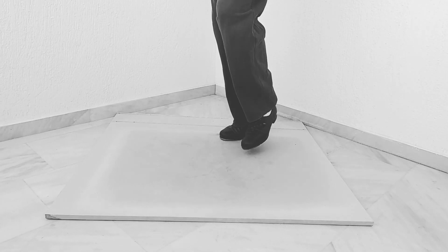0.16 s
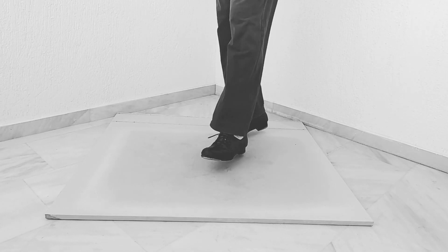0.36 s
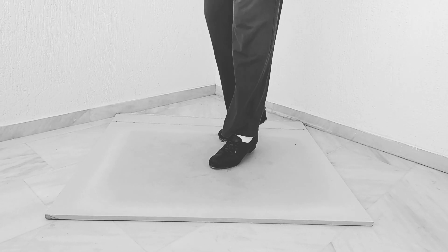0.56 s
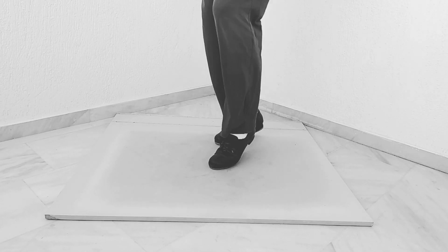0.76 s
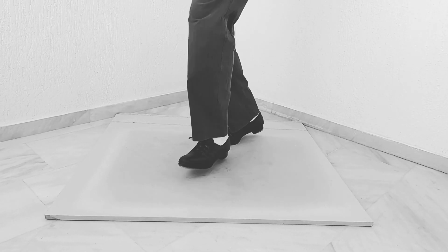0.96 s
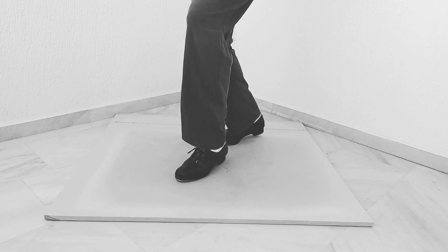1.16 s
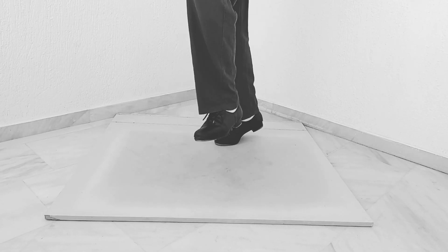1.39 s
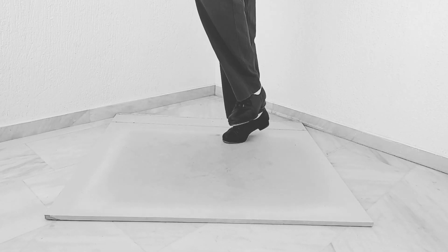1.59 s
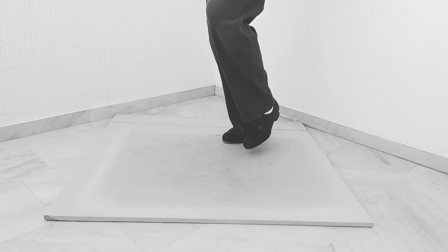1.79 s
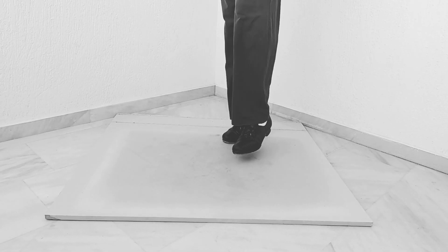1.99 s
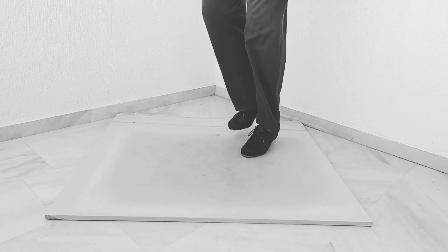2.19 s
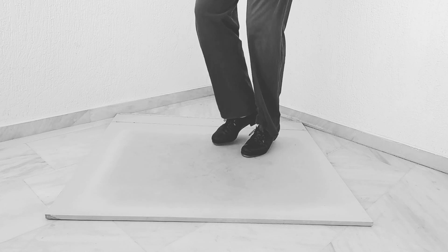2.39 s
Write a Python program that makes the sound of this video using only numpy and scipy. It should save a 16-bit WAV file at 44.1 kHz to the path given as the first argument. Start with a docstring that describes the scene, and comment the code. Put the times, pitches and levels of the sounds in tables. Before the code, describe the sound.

Tap shoes strike a hard board: three crisp hits, a loud double stomp, a faint sole shuffle with light ticks, then three more hits, close in stereo in a bare, reverberant room.

```python
"""A dancer's metal shoe plates strike a hard board in the corner of a bare, stone-floored room.
The echo of an earlier strike opens the scene; three strikes follow, then two close together as a stomp.
A sole then shifts on the board, with two light plate ticks, and three more strikes end the dance.
Each strike is a short rough contact that rings board and plate. Near walls answer strikes within 25 ms;
ticks and shuffle return half a second later. The room dies away over quiet noise, in a close stereo pair."""
import sys
import numpy as np
from scipy import signal
from scipy.fft import rfft, irfft
from scipy.io import wavfile
from scipy.ndimage import uniform_filter1d

SR = 44100
rng = np.random.default_rng(int(sys.argv[2]) if len(sys.argv) > 2 else 0)


def bounce(signal):
    """Save signal as a 16-bit WAV file at the path given by the first command-line argument."""
    frames = np.transpose(np.atleast_2d(signal))
    limited = np.clip(frames, -1, 1)
    pcm = np.round(limited * 32767).astype(np.int16)
    wavfile.write(sys.argv[1], SR, pcm)


def invert_db(x):
    """Field ratio 10**(x/20) for x, a level in decibels (scalar or array-like)."""
    u = np.asarray(x, float) / 20
    return 10 ** u


N = 108045  # length of the scene in samples
SIZE = 2 ** 15  # samples worked on for one strike or one room response

# centres of the bands that colour a strike: [Hz]
COLOUR_HZ = [60, 200, 400, 650, 1000, 1600, 2150, 2800, 3600, 4600, 5400, 6500, 7800, 9500, 12000]
# strikes of the shoe: (time [s], relative level [dB], first echo delay [s], first echo level [dB],
# change of the near walls' burst [dB], factor on ring times, then the colour at each COLOUR_HZ [dB])
STRIKES = [(.2360, 0, 0.0029, -1, 0.5, .9, -49, -40.5, -31, -27.5, -19, -18, -29, -16, -22, -24, -16.5, -18.5, -14, -37.5, -34),
           (0.4788, -5, 0.0041, 2, .5, 0.92, -42, -28.5, -30, -25.5, -19.5, -19.5, -37, -19, -17, -28, -13.5, -12.5, -17.5, -24.5, -29),
           (0.7393, -6, 0.0035, 7, 6, 1.04, -47, -24.5, -34, -16.5, -17, -16, -20, -19, -25.5, -19.5, -21.5, -19, -12.5, -36.5, -29.5),
           (1.0302, 5, 0.0042, -3, -13, 1.37, -53, -36, -34.5, -22.5, -15, -21.5, -19.5, -34, -23, -31.5, -27.5, -18.5, -24, -32, -32.5),
           (1.0448, -1, 0.0057, -5.5, -4, 1.27, -36, -15, -22, -14, -10.5, -25.5, -25.5, -14.5, -26, -30, -13.5, -12, -16.5, -21, -32),
           (1.5937, -6.5, .0036, 1.5, 5, 1.35, -50.5, -36, -16, -11.5, -19, -13, -13, -13, -16.5, -22, -24, -20, -19, -27.5, -32),
           (1.8797, -4.5, .0034, 1.5, 3.7, 1.1, -45, -33.5, -26, -21, -12, -11.5, -25, -11, -16, -17.5, -12.5, -12, -11.5, -21.5, -33),
           (2.1207, -8, .0034, 0, 3, 0.74, -48, -28, -34, -19, -17.5, -10.5, -14.5, -11.5, -19.5, -14.5, -11, -13.5, -6, -27, -32)]
# the strike before the scene opens: the columns of STRIKES after the time
EARLIER = (-11, .004, 7.5, 5, 0.85, -52, -29.5, -22.5, -16, -18.5, -12.5, -15.5, -13.5, -20, -18, -22,
           -24.5, -21, -31, -50)
EARLIER_S = -.035
# light ticks of the plate alone: (time [s], relative level [dB])
TICKS = [(1.264, -26.5), (1.485, -30)]
# echoes, ringing and colour of a tick: the columns of STRIKES after the level
TICK_COLOUR = (0.5, 0.5, -6, 0.4, -96, -94, -54, -54, -28.5, -29, -33, -43, -27, -18, -19, -18.5, -14, -25,
               -37.5)
# ringing tones of floor, board and plates:
# (frequency [Hz], level before colouring [dB], time to fall 60 dB before the strike's factor [s])
MODES = [(60, 13, 0.084), (126, 11.5, 0.055), (204.5, 6.5, 0.17), (262.2, 1.5, 0.24), (358, 6, 0.022),
         (449, 2, 0.076), (544, -3, .04), (650, -2, 0.073), (735, -1, 0.029), (888, 5, 0.029),
         (1098, 0.5, 0.0092), (1317, 6.5, 0.0058), (1584, 7.5, 0.006), (1890, 3, 0.0078), (2213, 8, 0.0033),
         (2900, -0.5, 0.0024), (3510, 4, 0.0034), (4540, 9.5, 0.0026), (5290, 9.5, 0.0017),
         (6360, 5.5, 0.0017), (6890, 9.5, 0.0048), (7080, 1.5, 0.002), (7850, 8.5, .005),
         (10000, 11, 0.009), (12900, -30.5, 0.0026)]
DETUNE = .02  # largest random shift of a tone, as a share of its frequency
CHATTER_S = .00045  # fading time constant of the contact
EVEN_HZ = 250  # width over which the contact's spectrum is evened out
STRIKE_DB = 5.5  # added to every strike and tick

# a sole shifts on the board: (start [s], length [s], level before its swell and the room [dB])
SHUFFLE = (1.1, 0.31, -51.5)
# colour of the rubbing: (frequency [Hz], relative level [dB])
SHUFFLE_COLOUR = [(100, -8.5), (220, 1.5), (500, -5), (1000, -4), (2000, -12.5), (4000, -16), (8000, -20.5),
                  (11000, -40)]
SHUFFLE_GRIT_DB = 1.5  # typical random change of level

# further single echoes: (delay [s], level before the burst change [dB], dulled above [Hz])
WALLS = [(.0065, -2, 5820), (.010, -2.5, 4060), (0.017, -4, 1800)]
# dying away of the room by band:
# (frequency [Hz], time to fall 60 dB [s], relative tail level [dB], relative near-wall burst level [dB])
ROOM = [(60, 0.27, -0.5, -1.5), (155, 0.71, -2.5, -9), (436, 0.63, 0.5, -9), (694, 0.59, 2.5, 1.5),
        (1320, 0.52, 2.5, 1.5), (3100, 0.43, 1, -14.5), (8280, 0.34, -3.5, -13.5), (11200, 0.26, -5, -10.5)]
TAIL_DB, BUILD_S = -13.5, 0.0014  # level of tail and burst together, and their build-up time
NEAR_END_S, NEAR_FADE_S, NEAR_RISE = 0.022, 0.00027, 1  # burst: end, fade time, power of its rise

# likeness of left and right: (frequency [Hz], likeness [0 to 1])
SAME = [(40, 1), (80, 0.9), (300, 0.86), (700, 0.49), (1500, 0.1), (4000, 0.067), (9000, 0.15)]
# balance of the two sides: (frequency [Hz], left minus right [dB])
LEAN = [(40, -13), (80, 10), (180, 5.5), (350, 4.5), (700, 3), (1400, 2.5), (2800, -1), (5600, -2.5),
        (10000, 0.5)]
LAG_S, DIRECT_LAG_S = .0001, .00005  # left hears later: shared diffuse sound, direct sound
# spectrum of the quiet noise: (frequency [Hz], relative level per Hz [dB])
HUSH = [(30, -2.5), (60, 2), (150, -9.5), (400, -15), (1000, -10.5), (3000, -19.5), (8000, -31),
        (10000, -63)]
HUSH_DB = -54.5  # noise level before the microphones' top fade
MIC_TOP_HZ = 12400


def read(points, hz, axis=1):
    """Reads a table column between its points, along a log-frequency axis."""
    table = np.array(points)
    return np.interp(np.log(hz + 1), np.log(table[:, 0] + 1), table[:, axis])


def causal(db):
    """Spectrum of the filter with these gains whose energy comes as early as possible."""
    log_gain = np.log(invert_db(np.r_[db, db[-2:0:-1]]))
    return np.exp(np.conj(signal.hilbert(log_gain)))[:len(db)]


def pair(a, b, hz):
    """Blends two spectra into left and right, alike by SAME and leaning by LEAN."""
    same, lean = np.clip(read(SAME, hz), 0, 1), invert_db(read(LEAN, hz) / 2)
    shared = same * a * np.exp(2j * np.pi * hz * LAG_S)
    right = shared + np.sqrt(1 - same ** 2) * b
    return np.array([a * lean, right / lean])


def hush():
    """The quiet noise of room and microphones: steady random noise, coloured by HUSH."""
    hz = np.fft.rfftfreq(N + 1, 1 / SR)
    sides = pair(*rfft(rng.standard_normal((2, N + 1))), hz)
    noise = irfft(sides * invert_db(read(HUSH, hz)), N + 1)[:, :N]
    return invert_db(HUSH_DB) * noise / noise.std()


def dying_room(burst_db):
    """Dense echoes of random sign die band by band, with an early burst off the near walls."""
    t, hz = np.arange(SIZE) / SR, np.fft.rfftfreq(SIZE, 1 / SR)
    taps = np.zeros((2, SIZE))
    # one echo falls somewhere in every 16 samples
    at = np.arange(0, SIZE - 16, 16) + rng.integers(0, 16, (2, SIZE // 16 - 1))
    np.put_along_axis(taps, at, rng.choice([-1., 1.], at.shape), 1)
    taps = pair(*rfft(taps), hz)
    near_rise = (t / NEAR_END_S) ** NEAR_RISE
    near = near_rise / (1 + np.exp(np.minimum((t - NEAR_END_S) / NEAR_FADE_S, 50)))
    tail = 0
    for k, (_, t60, db, near_db) in enumerate(ROOM):
        share = read([(row[0], j == k) for j, row in enumerate(ROOM)], hz)
        level = invert_db(db - 60 * t / t60) + invert_db(near_db + burst_db) * near
        tail = tail + irfft(taps * share) * invert_db(TAIL_DB) * level
    return tail * (1 - np.exp(-(t / BUILD_S) ** 2))


def single_echoes(echo_s, echo_db, burst_db, lead):
    """Direct sound and a few separate echoes, each reaching the two sides at its own moment."""
    hz = np.fft.rfftfreq(SIZE, 1 / SR)
    echoes = [(echo_s, echo_db, SR)]
    echoes += [(s, db + burst_db, dull_hz) for s, db, dull_hz in WALLS]
    side = rng.uniform(-1, 1, (len(echoes), 2))
    direct = np.zeros((2, SIZE))
    direct[0, lead + round(DIRECT_LAG_S * SR)] = direct[1, lead] = 1
    first = rfft(direct)
    for k, (s, db, dull_hz) in enumerate(echoes):
        late = lead + np.round((s + .0004 * side[k][:, None]) * SR)
        delay = np.exp(-2j * np.pi * hz * late / SR)
        first = first + invert_db(db) * delay / (1 + 1j * hz / dull_hz) ** 2
    lean = invert_db(read(LEAN, hz) / 2)
    return irfft(first * np.array([lean, 1 / lean]))


def room(x, echo_s, echo_db, burst_db):
    """Sound reaches the microphones directly, by single echoes and by the dense dying room."""
    lead = 64  # spare samples ahead of the direct sound, cut off again below
    tail = np.roll(dying_room(burst_db), lead, 1)
    heard = (single_echoes(echo_s, echo_db, burst_db, lead) + tail)[:, :SIZE * 3 // 4]
    return signal.fftconvolve(x[None], heard, axes=1)[:, lead:]


def shuffle(length, db):
    """Gritty rubbing is noise of uneven level that swells quickly and dies away."""
    t = np.arange(round(length * SR)) / SR
    hz = np.fft.rfftfreq(len(t), 1 / SR)
    # the level takes a new random value every 300 samples
    uneven_db = SHUFFLE_GRIT_DB * np.repeat(rng.standard_normal(200), 300)[:len(t)]
    grit = rng.standard_normal(len(t)) * invert_db(uneven_db)
    rub = irfft(rfft(grit) * invert_db(read(SHUFFLE_COLOUR, hz)), len(t))
    swell = np.sin(np.pi * (t / length) ** 0.52)
    return invert_db(db) * rub / rub.std() * swell


def strike(level_db, free, *colour_db):
    """A few milliseconds of rough contact ring every tone; the spot struck sets the colour."""
    t, hz = np.arange(SIZE) / SR, np.fft.rfftfreq(SIZE, 1 / SR)
    chatter = rng.standard_normal(300) * t[:300] ** 3 * np.exp(-t[:300] / CHATTER_S)
    contact = rfft(chatter, SIZE)
    # undo the contact's broad spectrum, so that the table sets the colour
    even_db = -10 * np.log10(uniform_filter1d(abs(contact) ** 2, int(EVEN_HZ / hz[1])))
    shift = rng.uniform(-1, 1, len(MODES))
    ring = 0
    for k, (mode_hz, db, t60) in enumerate(MODES):
        wave = np.cos(2 * np.pi * mode_hz * (1 + DETUNE * shift[k]) * t)
        tone = invert_db(-60 * t / (t60 * free)) * wave
        ring = ring + invert_db(db) * tone / np.linalg.norm(tone)  # equal energy before its level
    colour = causal(read(list(zip(COLOUR_HZ, colour_db)), hz) + even_db)
    return invert_db(level_db + STRIKE_DB) * irfft(rfft(ring) * contact * colour)[:SIZE // 2]


def scene():
    """All strikes, ticks and the shuffle, each heard through the room, over the quiet noise."""
    mix = np.zeros((2, N + 3 * SR))  # one spare second ahead, two behind
    rows = [(EARLIER_S, *EARLIER), *STRIKES, *[(*tick, *TICK_COLOUR) for tick in TICKS]]
    heard = []
    for s, level_db, echo_s, echo_db, burst_db, free, *colour_db in rows:
        dry_strike = strike(level_db, free, *colour_db)
        heard.append((s, room(dry_strike, echo_s, echo_db, burst_db)))
    # the shuffle shares the echoes of a tick
    heard.append((SHUFFLE[0], room(shuffle(*SHUFFLE[1:]), *TICK_COLOUR[:3])))
    for s, sound in heard:
        at = SR + round(s * SR)
        mix[:, at:at + sound.shape[1]] += sound
    return mix[:, SR:SR + N] + hush()


def top_cut(x):
    """Nothing passes above the cut-off."""
    return signal.sosfilt(signal.butter(12, 13810, fs=SR, output="sos"), x)


def record(dry):
    """The microphones fade at the top, and peaks beyond full scale are clipped."""
    top_fade = signal.butter(6, MIC_TOP_HZ, fs=SR, output="sos")
    mic = signal.sosfilt(top_fade, dry)
    return top_cut(np.clip(mic, -1, 1))


dry = scene()
out = record(dry)
bounce(out)
```